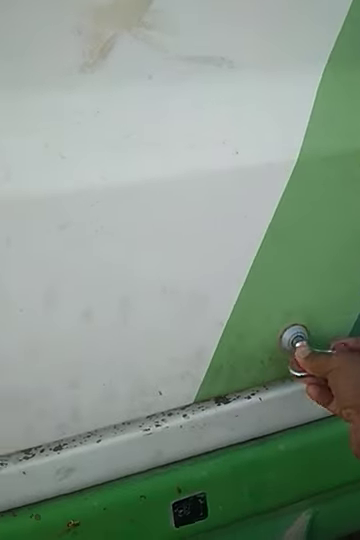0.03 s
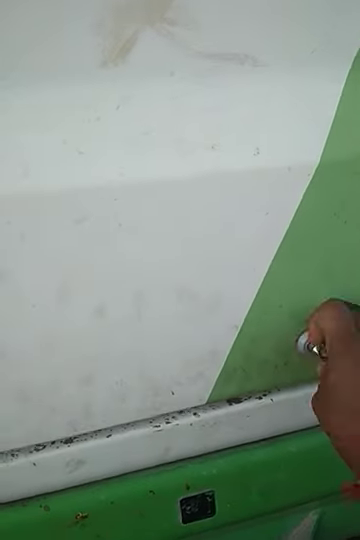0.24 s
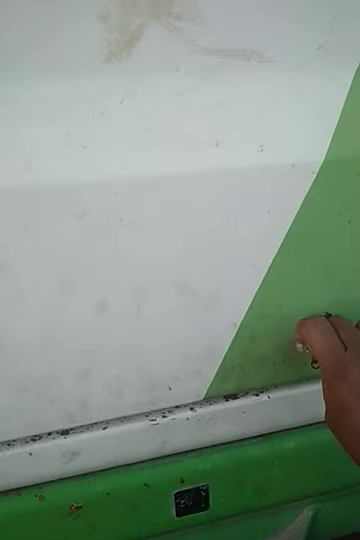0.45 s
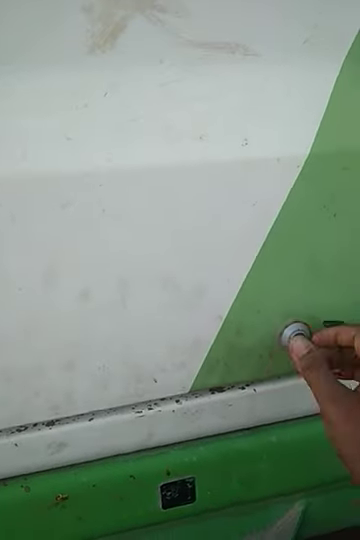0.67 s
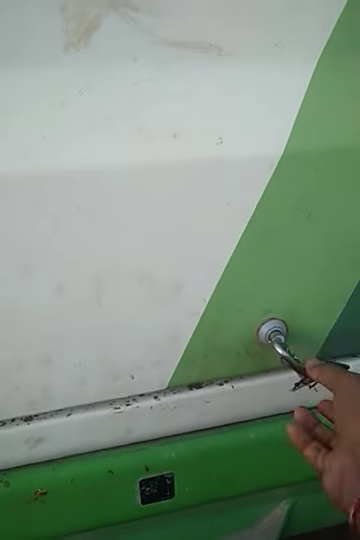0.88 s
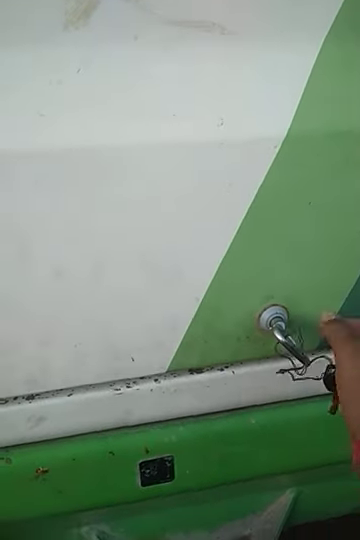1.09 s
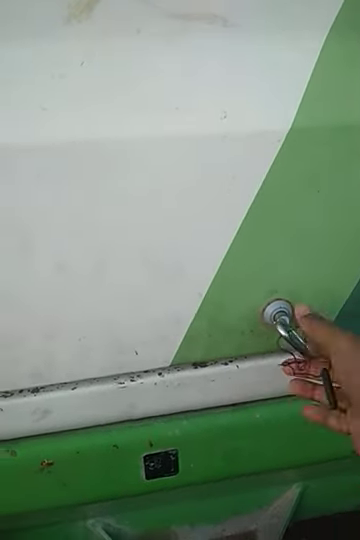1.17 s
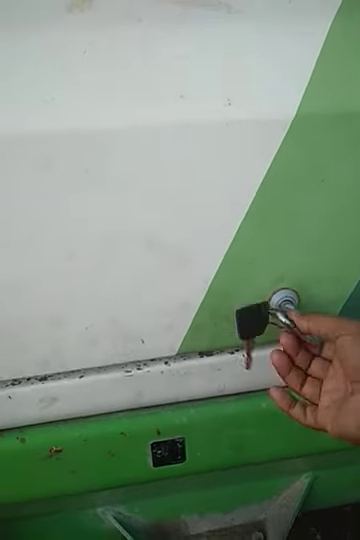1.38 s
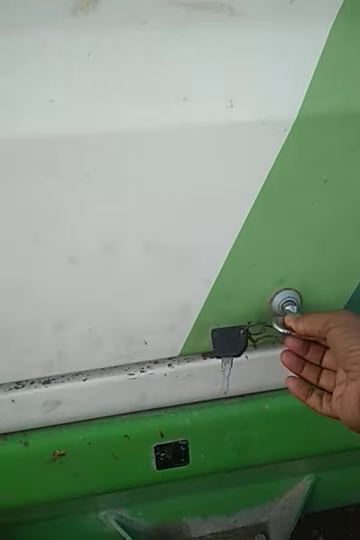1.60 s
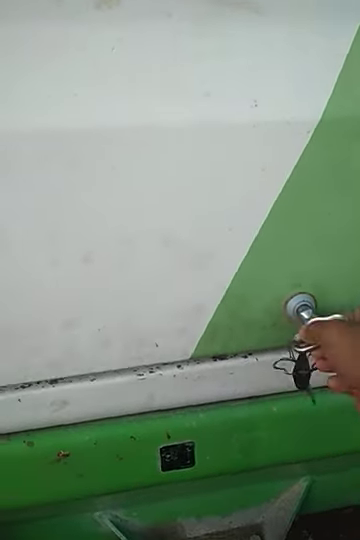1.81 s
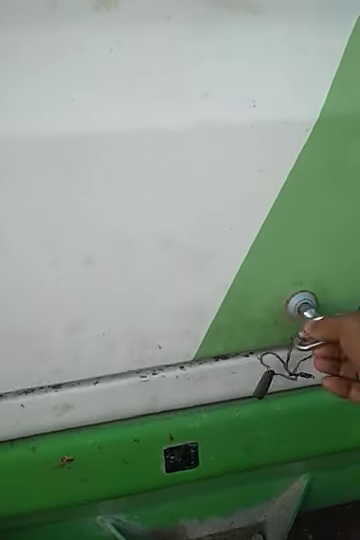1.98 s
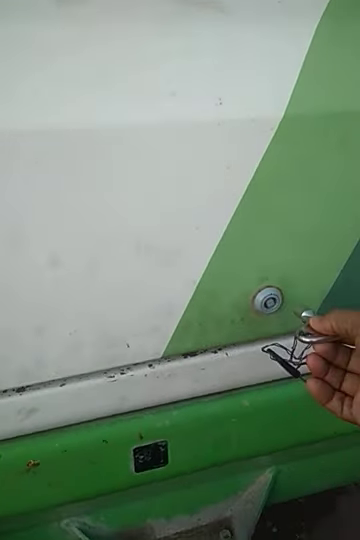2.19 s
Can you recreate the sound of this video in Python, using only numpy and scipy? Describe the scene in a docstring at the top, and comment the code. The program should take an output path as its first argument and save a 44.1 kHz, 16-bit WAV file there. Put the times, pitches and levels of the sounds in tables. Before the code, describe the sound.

A metal latch shuts with a loud clack at about 0.25 seconds, making a sheet-metal panel boom. Keys jingle lightly as the handle turns, with a click near 0.9 and a faint squeak around 1.2. A cluster of knocks, scrapes and clinks comes at about 1.7, then smaller clicks and a faint high tone after 2 seconds. An engine idles low underneath throughout.

```python
"""At the sheet-metal panel of a machine, a latch handle is turned by hand while an engine idles nearby.
The latch shuts with a clack, and the impact sets the panel's bending modes booming. As the handle turns,
its steel parts click and knock, and friction makes it rub, scrape and faintly squeak. A bunch of keys
in the lock jingles in high, lightly struck modes. A faint high tone lingers at the end. Beneath it all
the sheet rumbles as it flexes, and the engine's alternating strong and weak knocks ride on a low hum."""
import sys
import numpy as np
from scipy import signal
from scipy.fft import rfft, irfft
from scipy.io import wavfile
from scipy.ndimage import uniform_filter1d

SR = 44100
rng = np.random.default_rng(int(sys.argv[2]) if len(sys.argv) > 2 else 0)


def put_to_file(sound):
    """Save the sound as 16-bit audio at rate SR, in the file named by the first command-line argument."""
    columns = np.atleast_2d(sound).T  # one column per channel
    safe = np.clip(columns, -1, 1)
    whole_steps = np.round(safe * 32767)
    wavfile.write(sys.argv[1], SR, whole_steps.astype(np.int16))


N = 99225
TREBLE_PAN_DB = -9.5  # keys and thin high tone, left relative to right


def amp(db):
    """Amplitude ratio of a level in decibels."""
    return 10 ** (np.asarray(db) / 20)


def unit(x):
    """Scales a signal to unit RMS."""
    return x / np.sqrt(np.mean(x ** 2) + 1e-30)


def read(points, hz):
    """Interpolates a curve along a logarithmic frequency axis."""
    freq_hz, value = np.transpose(points)
    return np.interp(np.log(hz + 1), np.log(freq_hz + 1), value)


def level(points):
    """Amplitude envelope whose level runs linearly in decibels between points in time."""
    return amp(np.interp(np.arange(N) / SR, *np.transpose(points)))


def add(mix, start_s, sound):
    """Superposition: adds a sound to the mix from its start time on."""
    part = mix[:, max(round(start_s * SR), 0):][:, :sound.shape[1]]
    part += sound[:, :part.shape[1]]


def sized(x, db):
    """Gives a hit the energy of 10 ms of steady sound at this level."""
    return x * amp(db) * np.sqrt(SR / 100 / ((x ** 2).sum() / 2))


def colour(x, spectrum):
    """Minimum-phase filter: imposes a spectrum with no sound ahead of the onset."""
    log_gain = np.log(amp(read(spectrum, abs(np.fft.fftfreq(4096, 1 / SR)))))
    response = np.exp(np.conj(signal.hilbert(log_gain)))
    taps = np.fft.ifft(response).real[:2048]
    return signal.fftconvolve(x, taps[None], axes=1)[:, :x.shape[1]]


def dull(x, corner_hz):
    """Second-order low-pass filter."""
    return signal.sosfilt(signal.butter(2, min(corner_hz, SR / 2 - 100), fs=SR, output="sos"), x)


def stereo_noise(size, coherent_below_hz=694):
    """Spatial coherence: left and right are alike in the bass and unrelated in the treble."""
    mid, side = rfft(rng.standard_normal((2, size)))
    coherence = 1 / (1 + (np.fft.rfftfreq(size, 1 / SR) / coherent_below_hz) ** 2)
    spectrum = mid * np.sqrt((1 + coherence) / 2) + side * np.sqrt((1 - coherence) / 2) * [[1], [-1]]
    return irfft(spectrum, size)


def tail(decay_times, size):
    """Overlapping modes merge into noise of unit energy, each band decaying at its own rate."""
    t, hz = np.arange(size) / SR, np.fft.rfftfreq(size, 1 / SR)
    spectrum, out = rfft(stereo_noise(size)), np.zeros((2, size))
    centres_hz = np.geomspace(100, 12800, 8)
    for centre in centres_hz:
        band = irfft(spectrum * read(np.c_[centres_hz, centres_hz == centre], hz), size)
        out += band * amp(-60 * t / read(decay_times, centre))
    return out / np.sqrt((out ** 2).sum() / 2)


def impulse(size, right_delay_s=.00012):
    """An ideal impact, arriving a little later on the right."""
    x = np.zeros((2, size))
    x[0, 0] = x[1, round(right_delay_s * SR)] = 1
    return x


def tick(t60_s, snap, size=4096):
    """A hard contact: an impulse of height snap and exponentially decaying chatter."""
    chatter = stereo_noise(size) * amp(-60 * np.arange(size) / SR / t60_s)
    return chatter / np.linalg.norm(chatter[0]) + snap * impulse(size)


def grains(per_s, spread_db, max_spreads):
    """A Poisson process: tiny independent contacts of uneven strength."""
    strength = amp(spread_db * np.minimum(rng.exponential(1, N), max_spreads))
    occurs = rng.random(N) < per_s / SR
    return unit(strength * occurs * stereo_noise(N))


def slips():
    """Sliding friction: tiny slips of uneven size over a smooth hiss."""
    return unit(grains(per_s=900, spread_db=6, max_spreads=4) + 0.85 * stereo_noise(N))


def patchy(x, width_hz=330, span_s=.05, depth_db=4.5):
    """Shifting contact points bring out ever different narrow resonances."""
    frame, hop = 512, 128
    spectra = signal.stft(x, nperseg=frame, noverlap=frame - hop)[2]
    field = rng.standard_normal(spectra.shape[1:])
    spans = width_hz * frame / SR, span_s * SR / hop
    for axis in 0, 1, 0, 1:
        field = uniform_filter1d(field, round(spans[axis]), axis)
    return signal.istft(spectra * amp(depth_db * unit(field)), nperseg=frame, noverlap=frame - hop)[1][:, :N]


def engine(cycle_hz=16.88, rise_s=0.001388, rumble_db=-55, size=2048):
    """Periodic excitation: a strong and a weak knock each cycle, over harmonic hum and a low rumble."""
    # spectrum of one knock: freq_hz, gain_db
    knock_spectrum = [(60, -9.5), (270, 11.5), (400, -1.5), (560, 7), (780, -13), (1020, 0.5),
                      (1250, -32.5), (1700, -33.5), (3000, -46.5), (8000, -64)]
    # harmonics of the cycle rate: multiple, level_db
    harmonics = [(2, -89), (3, -56.5), (4, -61.5), (5, -66.5), (6, -62), (7, -80), (9, -67), (11, -69)]
    # spectrum of the steady rumble: freq_hz, gain_db
    rumble_spectrum = [(20, 2), (40, 6.5), (55, 1), (75, 2.5), (110, -0.5), (180, -11.5), (270, -6),
                       (400, -15), (600, -20), (800, -18), (1050, -19), (1350, -46.5), (3000, -54.5),
                       (7000, -86.5), (16000, -57)]
    t, out = np.arange(N) / SR, np.zeros((2, N))
    rise = t[:size] / rise_s
    crack = sized(np.roll(impulse(size), round(rise_s * SR), 1), 0)  # at the peak of the puff
    for start_s in np.arange(.0175, N / SR, 1 / cycle_hz):
        for delay_s, level_db in (0, -53), (.0305, -57.5):
            puff = sized(stereo_noise(size) * rise * np.exp(-rise), 0)
            knock = colour(crack + puff, knock_spectrum)
            add(out, start_s + delay_s, sized(knock, level_db + rng.standard_normal()))
    for multiple, level_db in harmonics:
        waver = 1 + 0.1 * unit(uniform_filter1d(rng.standard_normal(N), size=6000, mode="wrap"))
        hum = np.sin(2 * np.pi * (multiple * cycle_hz * t + rng.random()))
        out += amp(level_db) * unit(dull(waver * hum, corner_hz=150))
    return out + amp(rumble_db) * unit(colour(stereo_noise(N), rumble_spectrum))


def panel_flex():
    """Plate bending: the sheet gives a low rumble as the hand leans on the handle."""
    # envelope of the flexing: time_s, level_db
    envelope = [(0, -56), (.22, -50.5), (.3, -42.5), (.42, -51), (.55, -52), (1, -59.5), (1.55, -55.5),
                (1.75, -45), (1.86, -51.5), (1.97, -70), (2.06, -47), (2.14, -79), (2.25, -53)]
    # spectrum of the flexing: freq_hz, gain_db
    spectrum = [(25, -9), (60, -12.5), (120, 3.5), (170, -5), (300, -17.5), (600, -18.5), (2000, -101.5)]
    return unit(colour(stereo_noise(N), spectrum)) * level(envelope)


def handle_rub():
    """Friction noise: the handle grinds in its seat."""
    # envelope of the rubbing: time_s, level_db
    envelope = [(0, -62), (.06, -67), (.12, -74), (.22, -77.5), (.36, -62.5), (.46, -111), (.74, -99),
                (.86, -72.5), (.91, -75), (1.12, -87), (1.24, -66), (1.33, -73), (1.42, -73), (1.5, -79.5),
                (1.6, -80), (1.66, -64), (1.715, -47), (1.79, -65.5), (1.87, -62), (2.01, -83.5),
                (2.05, -66), (2.14, -79.5), (2.25, -65.5)]
    # spectrum of the rubbing: freq_hz, gain_db
    spectrum = [(300, -8), (1000, 8), (1550, -2), (1850, 2), (2450, -2), (3200, -11.5), (4000, -9),
                (5600, -19), (7500, -13), (16000, -31)]
    return unit(colour(patchy(slips()), spectrum)) * level(envelope)


def key_body(contacts, bandwidth_hz=60, modes_db=-1):
    """Impulse response: contacts radiate as bright ticks and also excite the keys' damped modes."""
    # modes of the keys and their ring: pitch_hz, level_db
    modes = [(2150, -8), (3870, -3.5), (4280, -10), (4920, -5.5), (5400, -7.5), (5620, -2), (6350, -7),
             (7050, -11.5), (7750, -16), (8700, -5), (9500, -3.5), (10300, 2.5), (11230, -0.5),
             (12150, 2.5), (12820, 3), (13600, 2), (15060, 2.5)]
    # spectrum of the direct tick: freq_hz, gain_db
    tick_spectrum = [(1000, -31.5), (3200, -35), (4300, -28.5), (5600, -18), (7600, -23.5), (8700, -4.5),
                     (9800, -6.5), (11000, 2), (12600, -5), (13500, -4), (15300, -4.5), (16000, -18.5)]
    t = np.arange(4096) / SR
    tones = sum(amp(db) * np.sin(2 * np.pi * (hz * t + rng.random((2, 1)))) for hz, db in modes)
    response = tones * np.exp(-np.pi * bandwidth_hz * t)
    ringing = signal.fftconvolve(contacts, response, axes=1)[:, :contacts.shape[1]]
    return unit(unit(colour(contacts, tick_spectrum)) + amp(modes_db) * unit(ringing))


def keys(ring_t60_s=.034, ring_rise_s=.00064, bounce_s=.0025, bounce_db=-9):
    """Impact and beating: each key ticks, rebounds and rings close modes; tiny touches shimmer between."""
    # keys striking one another: start_s, level_db, pitch_hz, ring_over_tick_db
    touches = [(0.057, -67, 10900, -22), (0.063, -72, 12600, -8), (.132, -72, 11800, -6),
               (0.241, -58, 12900, -16), (.298, -64, 9700, -1.5), (.665, -65.5, 10840, 11),
               (0.674, -68, 12330, 10), (0.758, -60, 10670, 14.5), (0.764, -66.5, 11500, 7),
               (0.793, -48.5, 15400, 9.5), (.819, -70, 5560, 17), (0.827, -71, 5530, 18),
               (0.85, -54, 15100, 1.5), (0.87, -62, 11300, -6), (0.938, -54.5, 14500, -10),
               (1, -64.5, 14800, 5), (1.05, -62, 14500, -4), (1.164, -55, 12800, 22),
               (1.213, -68, 10300, -2), (1.232, -62.5, 11200, 1), (1.247, -63.5, 11000, -6),
               (1.265, -63.5, 9600, -5), (1.301, -68.5, 12300, -7), (1.326, -66, 13400, 0),
               (1.371, -75, 11200, 17), (1.401, -62, 11800, 2), (1.611, -54.5, 12200, -6),
               (1.619, -60, 10800, 2), (1.741, -50, 13900, -12), (1.754, -40, 8060, -6.5),
               (1.779, -57, 9000, 0), (1.8519, -57, 13700, -6), (1.86, -55.5, 12000, -27),
               (1.864, -73, 10200, -11), (1.952, -61, 11200, -8), (1.978, -61.5, 10500, -21),
               (2.049, -65, 12900, 8), (2.112, -64, 13100, 3), (2.122, -60, 14100, 3),
               (2.135, -60, 12500, 0), (2.145, -68, 11000, -3), (2.221, -60.5, 12200, -13)]
    # envelope of the keys sliding over one another: time_s, level_db
    rustle = [(0, -66), (.07, -74), (.22, -95), (.25, -64.5), (.39, -71.5), (.42, -82.5), (.52, -96.5),
              (.55, -83), (.64, -88), (.86, -66), (.91, -77), (1.13, -81), (1.25, -72), (1.42, -73.5),
              (1.59, -104), (1.62, -69), (1.76, -65.5), (1.92, -73), (2.25, -69.5)]
    t = np.arange(4096) / SR
    shimmer = amp(-4.5) * grains(per_s=400, spread_db=5.5, max_spreads=3)
    out = key_body(patchy(shimmer + slips())) * level(rustle)
    for start_s, level_db, pitch_hz, ring_db in touches:
        cluster = np.zeros((2, len(t)))
        for k in range(5):  # each further mode is 3 dB stronger and may lie further off pitch
            mode_hz = pitch_hz * (1 + .012 * k * rng.uniform(-1, 1))
            cluster += amp(3 * k) * np.sin(2 * np.pi * (mode_hz * t + rng.random((2, 1))))
        ring = cluster * amp(-60 * t / ring_t60_s) * (1 - np.exp(-t / ring_rise_s))
        contact = tick(t60_s=0.0056, snap=0.76)
        add(contact, bounce_s * rng.uniform(.5, 1.5), amp(bounce_db) * tick(t60_s=0.0056, snap=0.76))
        clink = sized(key_body(contact), 0) + sized(ring, ring_db)
        add(out, start_s, sized(clink, level_db))
    return out * unit(amp([[TREBLE_PAN_DB], [0]]))


def latch_clicks():
    """Hard impact: steel parts meet so briefly that each click spans a wide band."""
    # parts of the latch meeting: start_s, level_db, corner_hz
    clicks = [(0.059, -57.5, 9000), (0.2416, -37.5, 4120), (0.2669, -43.5, 1400), (0.2971, -50.5, 14000),
              (0.9372, -46, 5200), (0.9402, -42.5, 5200), (1.689, -63, 4000), (1.704, -57, 2540),
              (1.7225, -62, 2480), (1.743, -58, 5050), (1.7557, -42.5, 7700), (1.851, -50.5, 8400),
              (1.859, -58, 6000), (1.894, -60, 2470), (2.045, -54, 3040), (2.069, -52, 2110),
              (2.176, -51.5, 7600), (2.22, -50.5, 3230)]
    # spectrum of a click: freq_hz, gain_db
    spectrum = [(200, 28), (800, -5), (1500, 8.5), (2400, 5.5), (3100, 2.5), (3900, 6.5), (5500, 7.5),
                (7200, 2.5), (10000, -7), (16000, -46.5)]
    out = np.zeros((2, N))
    for start_s, level_db, corner_hz in clicks:
        click = colour(tick(t60_s=.016, snap=.5), spectrum)
        add(out, start_s, sized(dull(click, corner_hz), level_db))
    return out


def panel_knocks(ring_db=-28, dense_db=-3, size=20000):
    """Modal vibration: each blow pushes the sheet and rings its modes; soft blows stay dull."""
    # blows on the panel: start_s, level_db, corner_hz, ring_share
    blows = [(.124, -47, 305, 0.54), (0.2402, -22.5, 4440, 0.48), (0.2455, -30, 1090, 0.12),
             (0.2522, -27.5, 520, 0.2), (0.2635, -36.5, 350, .1), (0.2803, -37, 380, 0.3),
             (0.383, -37.5, 111, 1), (0.5, -45, 447, .7), (.857, -47, 1410, 1), (.939, -42, 380, 0.87),
             (1.214, -42, 396, 0.56), (1.327, -48, 356, 1), (1.368, -48.5, 386, 1), (1.532, -45, 270, 0.32),
             (1.638, -42, 231, 0.54), (1.67, -45, 350, 1), (1.7099, -39, 1090, 0.1),
             (1.7145, -38.5, 1300, 0.048), (1.724, -42, 890, 0.12), (1.738, -41.5, 410, 0.19),
             (1.765, -42, 194, 0.26), (1.909, -47.5, 225, 0.54), (2.042, -45, 260, 0.38),
             (2.066, -50, 225, 0.96), (2.2122, -47, 2500, 0.045), (2.2205, -50, 2470, 0.16)]
    # distinct modes of the panel: pitch_hz, level_db, t60_s
    modes = [(92.7, -9, 0.78), (114.7, -7.5, 0.4), (126.8, -4.5, 0.49), (172, -10, 0.056),
             (219, -2.5, 0.16), (284.6, 3, 0.15), (335.5, -1.5, 0.24), (510, -11.5, 0.088), (539, -19, .16),
             (612, -17, 0.24), (699.5, -6, .1), (850, -8.5, 0.054), (1044, -8.5, 0.18), (1213, -20, 0.29),
             (1513, -11, 0.12), (2430, -17.5, 0.15)]
    # decay of the panel's dense modes: freq_hz, t60_s
    decay_times = [(100, 0.24), (400, 0.14), (1000, 0.058), (3000, 0.13), (12000, 0.018)]
    # spectrum of a blow: freq_hz, gain_db
    spectrum = [(30, -23.5), (80, -2.5), (250, 4.5), (400, 0.5), (760, 0), (1100, -15), (1550, -16.5),
                (1950, -16.5), (2600, -20), (3200, -22.5), (5000, -24), (8000, -27.5), (16000, -20.5)]
    t, out = np.arange(size) / SR, np.zeros((2, N))
    ring = sum(amp(db - 60 * t / t60_s) * np.sin(2 * np.pi * hz * t) for hz, db, t60_s in modes)
    for start_s, level_db, corner_hz, ring_share in blows:
        push = colour(impulse(size) + amp(dense_db) * tail(decay_times, size), spectrum)
        knock = push / np.linalg.norm(push[0]) + ring_share * amp(ring_db) * ring
        add(out, start_s, -sized(dull(knock, corner_hz), level_db))
    return out


def handle_scrapes(slips_per_s=4000, q=3.85):
    """Stick-slip friction: each run of tiny slips excites one resonance of the handle."""
    # short gritty scrapes: start_s, length_s, level_db, resonance_hz
    scrapes = [(0.265, .003, -41, 2430), (0.266, .003, -39, 1477), (.495, .03, -60.5, 850),
               (.497, .02, -78.5, 1854), (0.755, .015, -78, 2250), (1.339, 0.033, -77, 2430),
               (1.393, 0.036, -68, 2330), (1.699, 0.03, -57.5, 2360), (1.709, .012, -41, 631),
               (1.712, .028, -47.5, 348), (1.715, .03, -56, 813), (1.817, 0.032, -70.5, 2470),
               (2.035, 0.036, -70, 2120), (2.212, 0.01, -51, 774)]
    out = np.zeros((2, N))
    for start_s, length_s, level_db, resonance_hz in scrapes:
        size = max(round(length_s * SR), 100)
        run = stereo_noise(size) * (rng.random(size) < slips_per_s / SR) * signal.windows.tukey(size)
        run = np.pad(run, ((0, 0), (0, 256)))  # time for the resonance to die away
        b, a = signal.iirpeak(resonance_hz, q, SR)
        scrape = signal.lfilter(b, a, signal.lfilter(b, a, run))
        add(out, start_s, amp(level_db) * unit(scrape))
    return out


def squeak(start_s=1.132, length_s=.118, pitch_hz=522, level_db=-65.5):
    """Frequency and amplitude modulation: a thin harmonic tone rises and falls, slightly hoarse."""
    # harmonics above an absent fundamental: multiple, level_db
    partials = [(2, 4.5), (3, 4.5), (4, -22), (5, -11)]
    t, out = np.arange(0, length_s, 1 / SR), np.zeros((2, N))
    arch = np.sin(np.pi * t / length_s)
    jitter, flutter = unit(uniform_filter1d(rng.standard_normal((2, len(t))), size=150))
    cycles = np.cumsum(pitch_hz * (1 + .097 * arch + 0.0084 * jitter)) / SR
    tone = sum(amp(db) * np.sin(2 * np.pi * (k * cycles + rng.random((2, 1)))) for k, db in partials)
    envelope = np.sqrt(abs(arch)) * (1 + 0.35 * flutter)
    add(out, start_s, amp(level_db) * unit(tone * envelope))
    return out


def thin_high_tone(start_s=1.98, pitch_hz=14080, level_db=-64, t60_s=2.5):
    """Amplitude modulation: a faint, thin, wavering tone near 14 kHz lingers to the end."""
    t, out = np.arange(N) / SR, np.zeros((2, N))
    waver = 1 + .4 * unit(uniform_filter1d(rng.standard_normal((2, N)), size=200))
    add(out, start_s, amp(level_db - 60 * t / t60_s) * waver * np.sin(2 * np.pi * pitch_hz * t))
    return out * unit(amp([[TREBLE_PAN_DB], [0]]))


def scene():
    """Superposition of the close sounds, their short reverberation and the engine behind."""
    # decay of the reverberation: freq_hz, t60_s
    decay_times = [(100, 0.14), (600, 0.52), (2000, 0.16), (5000, 0.34), (14000, 0.16)]
    handle = latch_clicks() + handle_rub() + handle_scrapes()
    treble = keys() + thin_high_tone()
    panel = panel_knocks()
    reflected = amp(-8.5) * handle + amp(-14) * treble + amp(-16) * panel
    reverberation = signal.fftconvolve(reflected, tail(decay_times, size=24000), axes=1)[:, :N]
    return handle + treble + panel + reverberation + squeak() + panel_flex() + engine()


def record(dry, low_cut_hz=40.7, high_cut_hz=15750):
    """Linear filtering: left and right differ in colour and lose the deepest bass and highest treble."""
    # level difference between the sides: freq_hz, left_minus_right_db
    balance = [(60, 3), (250, -0.3), (420, 2), (680, 5.5), (1000, -1.5), (1400, -2.5), (2400, 3),
               (5000, 4.5), (15000, 0.5)]
    lean_db = read(balance, np.fft.rfftfreq(N, 1 / SR)) * np.array([[.5], [-.5]])
    coloured = irfft(rfft(dry) * amp(lean_db), N)
    high_pass = signal.butter(3, low_cut_hz, "high", fs=SR, output="sos")
    low_pass = signal.firwin(301, high_cut_hz, window=("kaiser", 8), fs=SR)
    return signal.oaconvolve(signal.sosfilt(high_pass, coloured), low_pass[None], "same")


dry = scene()
out = record(dry)
put_to_file(out)
```